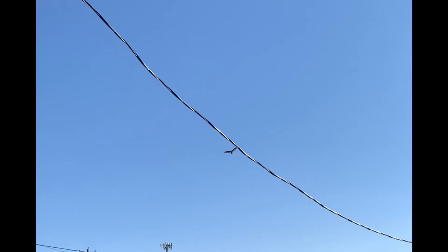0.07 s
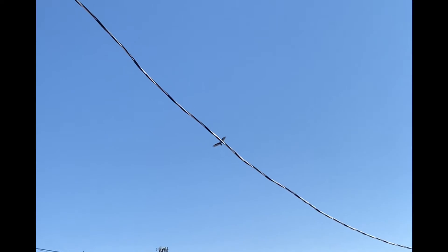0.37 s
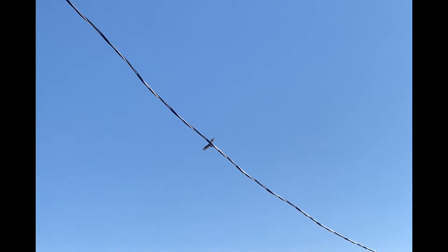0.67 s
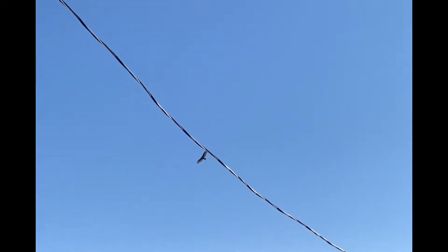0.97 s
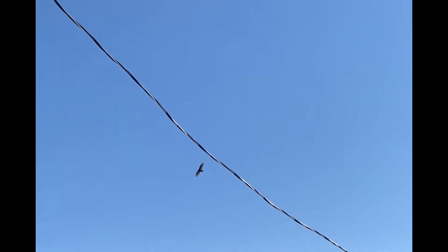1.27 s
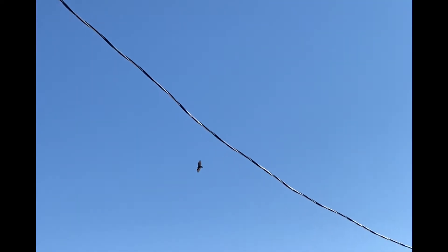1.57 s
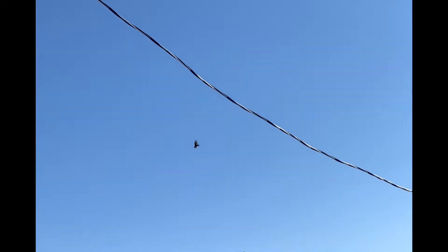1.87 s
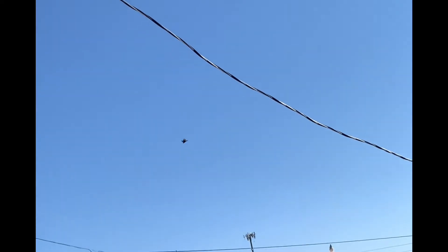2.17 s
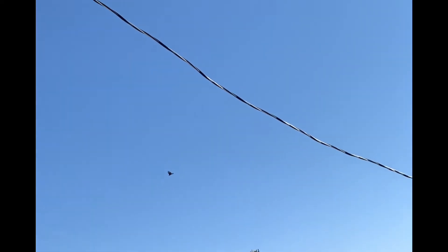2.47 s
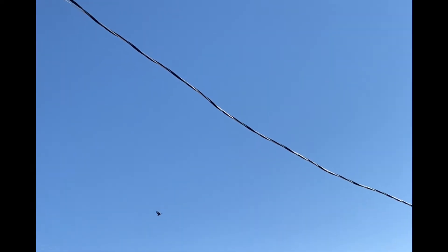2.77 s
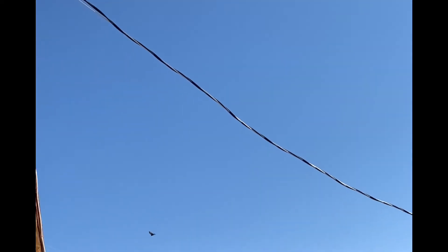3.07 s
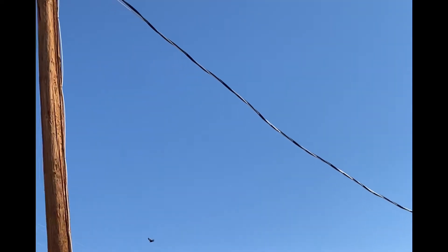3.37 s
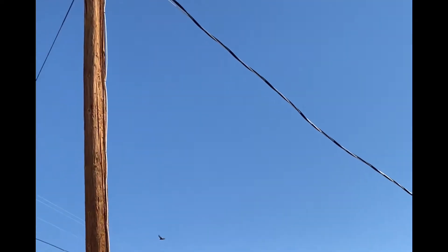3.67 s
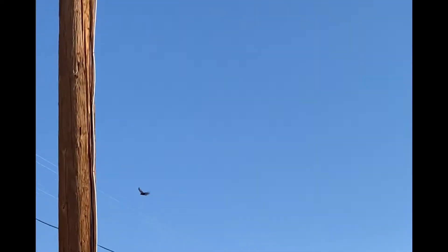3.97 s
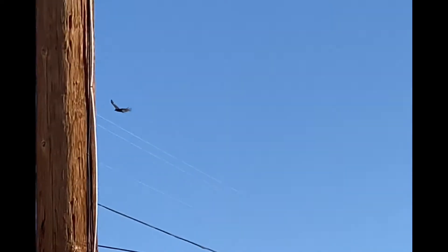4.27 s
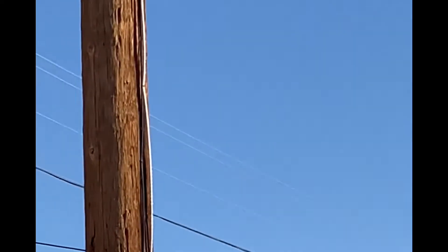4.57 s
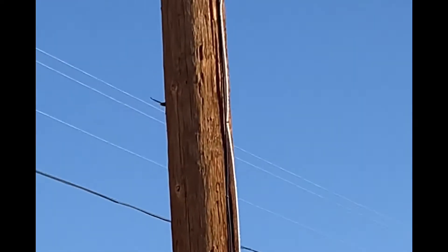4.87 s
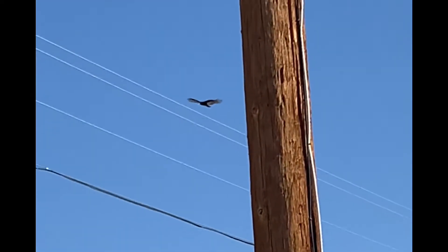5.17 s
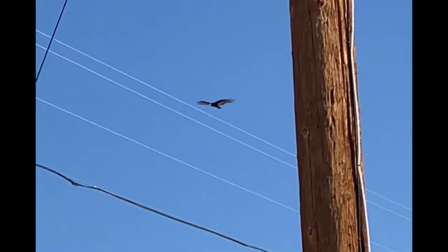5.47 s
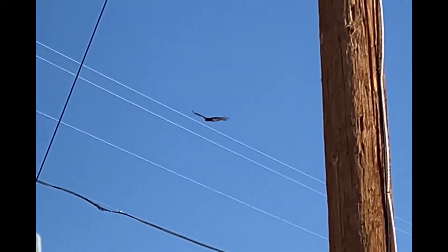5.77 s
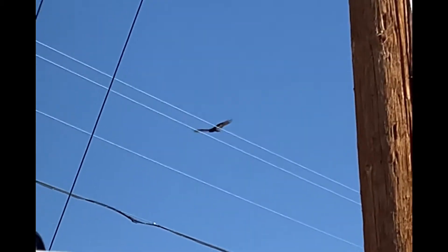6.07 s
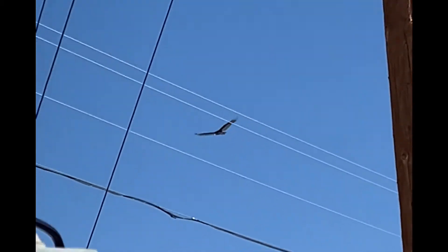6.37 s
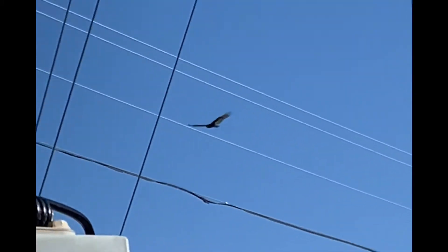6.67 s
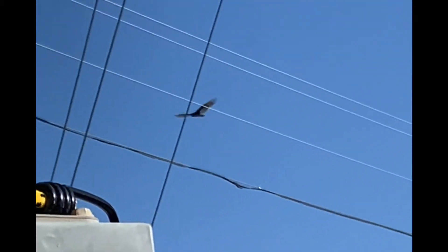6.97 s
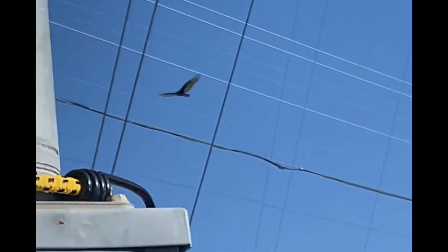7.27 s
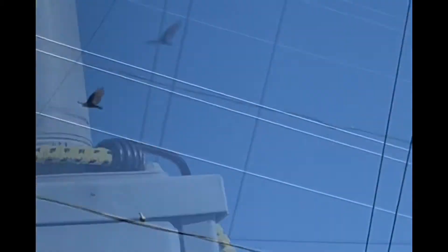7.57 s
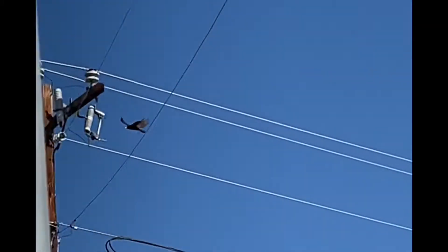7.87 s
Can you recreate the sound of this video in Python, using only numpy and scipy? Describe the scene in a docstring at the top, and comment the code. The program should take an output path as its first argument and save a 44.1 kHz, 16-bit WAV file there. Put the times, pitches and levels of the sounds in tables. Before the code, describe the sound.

Gusty wind rumbles and thuds on the microphone outdoors, over faint distant traffic and a few light handling clicks.

```python
"""Under power lines, a hand-held stereo microphone follows a soaring bird, itself unheard.
Gusts hit from the start, rumbling and shedding eddies that thud across the ports; far behind, tyres
wash, and close by, clothing swishes softly. From 2 s the hand ticks and knocks on the case, and a
distant engine draws away by 3.5 s. The wind eases, a faint electric buzz comes up around 6 s,
then hard gusts return for the last second and a half."""
import sys
import numpy as np
from scipy import signal
from scipy.fft import rfft, irfft, next_fast_len
from scipy.io import wavfile
from scipy.ndimage import uniform_filter1d

SR = 44100
rng = np.random.default_rng(int(sys.argv[2]) if len(sys.argv) > 2 else 0)


def put_to_file(sound):
    """Save the sound as 16-bit audio at rate SR, in the file named by the first command-line argument."""
    columns = np.atleast_2d(sound).T  # one column per channel
    safe = np.clip(columns, -1, 1)
    whole_steps = np.round(safe * 32767)
    wavfile.write(sys.argv[1], SR, whole_steps.astype(np.int16))


N = 354123
T = np.arange(N) / SR

# far road: t/s, tyre roar before trim/dB, tyre hiss/dB
ROAD_LEVEL = [(0.1, -59, -82.5), (0.7, -55.5, -69.5), (1.7, -60.5, -71), (2.6, -57.5, -70.5),
              (3.4, -60, -74.5), (4.1, -60, -77.5), (6.4, -62, -79.5), (7.0, -60.5, -81.5),
              (7.45, -65.5, -74), (8.0, -64, -81.5)]
# spectra of the tyres and the thin floor of air: f/Hz, relative level/dB
ROAR_SPECTRUM = [(150, 5), (300, 8.5), (480, -0.5), (650, -3), (1250, -2.5), (1750, -7), (2100, -15),
                 (2700, -34), (4000, -57)]
HISS_SPECTRUM = [(1200, -27), (2400, 3.5), (2850, -1), (3500, -2.5), (4600, -8), (5500, -14.5),
                 (7000, -17.5), (11000, -33), (15000, -37)]
AIR_SPECTRUM = [(2000, 6), (6500, -5.5), (8500, -7.5), (11000, -0.5), (14000, -13.5), (15500, -20.5)]
# distant engine drawing away: t/s, level/dB
ENGINE_LEVEL = [(0, -63), (1.0, -65.5), (2.5, -66), (3.5, -80)]
# its exhaust resonances: f/Hz, width/Hz, relative level/dB
EXHAUST_MODES = [(627, 260, 3.5), (1039, 35, -4.5), (1178, 25, -4)]
# airy rushes in the background: crest t/s, level/dB, length/s
RUSHES = [(0.309, -66, 0.59), (0.943, -67, 0.3), (5.147, -69.5, 0.54)]
# partials of the electric buzz: f/Hz, base level/dB
BUZZ_PARTIALS = [(884, -84.5), (1178, -84.5), (1771, -78.5), (1949, -87.5), (2362, -79.5), (2421, -79.5),
                 (2597, -85.5), (3483, -94.5)]
# the buzz as the microphone turns: t/s, gain/dB
BUZZ_GAIN = [(5.3, -9), (5.8, -0.5), (6.35, 3), (6.55, -11)]
# clothing near the microphone: crest t/s, base level/dB, length/s, ring f/Hz
SWISHES = [(0.664, -69, 0.13, 3570), (2.716, -69, 0.47, 2650), (3.193, -69, 0.22, 3370),
           (3.722, -70, 0.15, 2800), (4.747, -67.5, 0.23, 3500), (4.943, -73, 0.18, 2650),
           (5.824, -70, 0.25, 3420), (6.295, -72, 0.16, 3320), (6.82, -71, 0.19, 3500),
           (7.487, -74, 0.21, 3500), (8.02, -69.5, 0.15, 3540)]
# its hiss: f/Hz, relative level/dB
CLOTH_SPECTRUM = [(1200, -16), (2400, 8.5), (3000, 2), (3600, 1), (4100, -2.5), (4500, -12.5),
                  (7000, -14.5), (11000, -32.5), (15000, -47)]
# sleeve and fingers on the case: t/s, level/dB, half length/s, centre f/Hz
RUBS = [(0.929, -63, 0.022, 5200), (1.101, -57, 0.027, 1860), (1.11, -67, 0.033, 4600),
        (1.302, -64, 0.037, 2790), (1.962, -60.5, 0.057, 3840), (1.973, -70, 0.034, 5900)]
# hand ticking on the case: t/s, peak/dB, ring f/Hz, t60/s, contact/dB
TICKS = [(2.106, -46.5, 3200, 0.017, -59), (2.326, -51, 3060, .008, -56), (2.483, -39, 3030, 0.011, -43.5),
         (2.498, -48, 3130, .007, -53), (2.566, -49.5, 3030, .0064, -57), (2.924, -49.5, 3240, 0.014, -43),
         (3.682, -40, 3150, 0.0061, -47), (4.618, -60, 3900, .005, -55), (5.423, -61, 4300, .003, -47.5),
         (6.114, -53, 3080, 0.14, -67)]
# knocks of the grip: t/s, peak/dB, length/s, tilt/(dB per octave)
KNOCKS = [(2.486, -43.5, 0.011, -14), (3.6793, -32.5, 0.0034, 1), (4.556, -38, 0.017, -1.5)]
# resonances of the case: f/Hz, width/Hz, relative level/dB
CASE_MODES = [(528, 166, 7.5), (1056, 380, 4.5), (1470, 400, 5), (2320, 340, -2.5), (3500, 1500, -13),
              (5900, 650, -41)]
# breeze at the microphone: t/s, base rumble/dB
BREEZE = [(0.1, -34), (1.0, -32.5), (1.4, -40.5), (2.3, -33.5), (2.85, -40), (3.3, -33), (3.9, -38.5),
          (4.75, -42.5), (5.1, -38), (5.45, -44.5), (5.8, -37), (6.38, -41.5), (6.88, -27), (7.25, -36.5),
          (7.9, -38)]
# gusts on top of it: crest t/s, length/s, base rumble/dB, base buffeting/dB
GUSTS = [(0.184, 0.061, -27.5, -37), (0.465, 0.052, -25.5, -37.5), (0.698, 0.12, -26, -36.5),
         (0.946, 0.05, -25.5, -31), (1.254, 0.14, -20.5, -27.5), (1.425, 0.088, -22.5, -34.5),
         (1.62, 0.12, -26.5, -32.5), (1.885, 0.24, -27, -38.5), (2.078, 0.11, -26.5, -31.5),
         (2.273, 0.15, -26, -30), (3.153, 0.24, -29.5, -37.5), (3.449, 0.035, -27, -24),
         (3.637, 0.14, -29, -32), (4.083, 0.17, -34.5, -43), (4.618, 0.046, -31, -36.5),
         (5.035, 0.22, -35.5, -37), (5.61, 0.046, -35.5, -38), (6.118, 0.088, -35.5, -33),
         (6.533, 0.079, -32.5, -38.5), (6.757, 0.064, -24, -25), (7.051, 0.12, -23.5, -28),
         (7.367, 0.14, -38.5, -33), (7.627, 0.15, -29, -28), (7.823, 0.23, -31, -30.5),
         (7.94, 0.082, -25.5, -30.5)]
# spectra of large, middling and fine eddies: f/Hz, relative level/dB
RUMBLE_SPECTRUM = [(16, -44.5), (31, -9.5), (42, -1.5), (60, 5), (80, 1), (110, -2), (135, -12),
                   (190, -55.5), (500, -110)]
BUFFET_SPECTRUM = [(40, -60.5), (70, -27), (100, -8), (140, 3.5), (180, -4), (260, -14.5), (380, -20),
                   (520, -38.5), (1200, -110)]
FLUTTER_SPECTRUM = [(100, -31), (320, 1.5), (450, -1.5), (650, -11), (900, -23.5), (1400, -28.5),
                    (3000, -85)]
# fast eddies tearing at the ports: t/s, level/dB, half length/s, upper f/Hz
CRACKLES = [(1.218, -52, .005, 1000), (6.097, -47.5, 0.006, 960), (6.74, -45, 0.002, 1510),
            (6.781, -44, 0.0077, 1490), (6.892, -45, 0.0033, 1250), (7.725, -51, .008, 1500),
            (7.852, -47, 0.0018, 1050)]
# strongest single eddies: t/s, peak before trim/dB, starting f/Hz
EDDIES = [(0.47, -21.5, 260), (0.532, -23.5, 320), (0.66, -21, 380), (0.706, -20.5, 560),
          (1.02, -31.5, 520), (1.191, -20.5, 370), (1.203, -16.5, 500), (1.215, -15.5, 550),
          (1.234, -23, 500), (1.287, -20, 450), (1.614, -20, 695), (1.629, -26, 430), (1.789, -24.5, 420),
          (1.859, -21.5, 469), (1.931, -21.5, 600), (1.938, -17, 340), (2.011, -24, 600), (2.094, -25, 520),
          (2.162, -25, 489), (2.251, -23, 340), (2.463, -23, 290), (3.216, -26, 430), (3.231, -23.5, 500),
          (3.424, -31.5, 560), (3.452, -27, 510), (3.566, -28, 780), (3.576, -25, 480), (3.603, -21.5, 520),
          (3.632, -24.5, 700), (3.645, -23, 540), (3.728, -33, 470), (4.616, -23.5, 600),
          (4.984, -32.5, 450), (5.157, -34, 420), (5.914, -19.5, 350), (5.931, -19, 307), (6.088, -28, 565),
          (6.123, -30.5, 480), (6.49, -22, 280), (6.684, -27, 540), (6.706, -31.5, 660),
          (6.739, -27.5, 700), (6.768, -30.5, 950), (6.784, -25, 650), (6.862, -30.5, 720),
          (6.901, -24.5, 480), (6.964, -29, 800), (7.014, -19, 400), (7.091, -28.5, 568), (7.387, -28, 685),
          (7.579, -14.5, 430), (7.611, -23.5, 420), (7.708, -22.5, 720), (7.721, -27.5, 480),
          (7.771, -17, 310), (7.798, -11.5, 470), (7.822, -23.5, 650), (7.843, -26, 700),
          (7.851, -25.5, 700)]
# the microphone's two close ports: f/Hz, left-right likeness from 0 to 1
PORT_LIKENESS = [(300, 0.99), (450, 0.65), (700, 1), (1200, 0.18), (1750, 0.59), (2400, 0.035),
                 (3400, 0.33), (4600, 0.99)]
# lag of the right port: f/Hz, phase/rad
PORT_LAG = [(900, 0), (1700, .6), (2500, 1.6), (3600, 1.7), (4600, 3.1), (5700, 4.7), (6500, 6.2),
            (7400, 6.4), (9000, 9.4), (15300, 18.8)]
# corner below which the image closes to mono: t/s, f/Hz
MONO_CORNER = [(1.8, 950), (3.2, 250), (4.3, 367), (6.1, 175), (7.48, 265), (7.63, 600)]

FFT_SIZE = next_fast_len(N, True)
FFT_HZ = np.maximum(np.arange(FFT_SIZE // 2 + 1) * SR / FFT_SIZE, 1)


def from_db(db):
    """Decibels to gain."""
    return 10 ** (np.asarray(db) / 20)


def rms_one(x):
    """Scale to unit rms."""
    return x / np.sqrt(np.mean(x ** 2) + 1e-20)


def in_time(rows):
    """Each column of a curve at every sample."""
    times, *columns = np.transpose(rows)
    return [np.interp(T, times, column) for column in columns]


def over_frequency(points):
    """A curve at every FFT bin, joined on a log-frequency axis."""
    hz, value = np.transpose(points)
    return np.interp(np.log(FFT_HZ), np.log(hz), value)


def noise(spectrum):
    """Noise of a given colour, rms 1."""
    white = rfft(rng.standard_normal(FFT_SIZE))
    return rms_one(irfft(white * from_db(over_frequency(spectrum)), FFT_SIZE)[:N])


def drift(rate_hz, hop=40):
    """Smooth random wander with spread 1, mostly slower than rate_hz."""
    pole = np.exp(-2 * np.pi * hop * rate_hz / SR)
    white = rng.standard_normal(N // hop + 2002)
    slow = signal.lfilter([1], [1, -2 * pole, pole * pole], white)[2000:]
    return np.interp(np.arange(N) / hop, np.arange(len(slow)), rms_one(slow))


def evened(x, span_s):
    """Keep the fast grain of a sound but hold its slower level at 1."""
    width = int(span_s * SR)
    return x / np.sqrt(uniform_filter1d(uniform_filter1d(x ** 2, width), width) + 1e-6)


def resonance(x, hz, width_hz):
    """A resonance with steep skirts (two poles, twice)."""
    r = np.exp(-np.pi * width_hz / SR)
    section = [1 - r, 0, r - 1, 1, -2 * r * np.cos(2 * np.pi * hz / SR), r * r]
    return signal.sosfilt([section, section], x)


def swell(crest_s, length_s, rise_share=0.46):
    """A rounded rise to 1 and fall, above 0.6 for length_s."""
    reach_s = length_s * np.where(T < crest_s, rise_share, 1 - rise_share)
    return np.exp(-np.minimum(((T - crest_s) / reach_s) ** 2, 60) / 2)


def at_ports(common, diffuse):
    """The two ports hear the bass alike; higher up they differ and the right one lags."""
    alike = over_frequency(PORT_LIKENESS)
    fade = signal.windows.tukey(N, 0.002)
    mid = np.sqrt((1 + alike) / 2) * rfft(common * fade, FFT_SIZE)
    side = np.sqrt((1 - alike) / 2) * rfft(diffuse * fade, FFT_SIZE)
    lag = np.exp(-1j * np.interp(FFT_HZ, *np.transpose(PORT_LAG)))
    return irfft([mid + side, (mid - side) * lag], FFT_SIZE)[:, :N]


def traffic(roar_trim_db=5.5, air_db=-80):
    """Tyres on a far road: a diffuse roar and a fainter hiss over a thin steady floor."""
    roar_db, hiss_db = in_time(ROAD_LEVEL)
    waver_db = 0.5 * drift(8)
    roar = from_db(roar_db + roar_trim_db + waver_db)
    hiss = from_db(hiss_db + waver_db)
    common, diffuse = [roar * noise(ROAR_SPECTRUM) + hiss * noise(HISS_SPECTRUM)
                       + from_db(air_db) * noise(AIR_SPECTRUM) for _ in range(2)]
    return at_ports(common, diffuse)


def engine():
    """Narrow resonances of a far exhaust, blurred by the distance."""
    level_db, = in_time(ENGINE_LEVEL)
    white = rng.standard_normal((2, N))
    drone = sum(from_db(db) * rms_one(resonance(white, hz, width)) for hz, width, db in EXHAUST_MODES)
    return at_ports(*from_db(level_db) * drone)


def rush(centre_hz=1800, width_hz=800):
    """An airy rush comes and goes in the background."""
    level = sum(from_db(db) * swell(s, length, rise_share=0.29) for s, db, length in RUSHES)
    band = rms_one(resonance(rng.standard_normal((2, N)), centre_hz, width_hz))
    return at_ports(*level * band)


def from_afar(x, depth_db=3.0, span_s=0.12, span_hz=70):
    """Far sound comes by many shifting paths, so narrow bands swell and fade on their own."""
    hz, s, frames = signal.stft(x, SR, nperseg=2048)
    fading = rng.standard_normal(frames.shape[-2:])
    fading = uniform_filter1d(fading, round(span_hz / hz[1]), axis=0)
    fading = uniform_filter1d(fading, round(span_s / s[1]), axis=1)
    return signal.istft(frames * from_db(depth_db * rms_one(fading)), SR)[1][..., :N]


def buzz(waver_db=5.5, wander_rad=1.5):
    """High partials of an electric hum some way off, wavering in the moving air."""
    gain_db, = in_time(BUZZ_GAIN)
    hum = np.zeros(N)
    for hz, db in BUZZ_PARTIALS:
        amplitude = np.sqrt(2) * from_db(db + gain_db + waver_db * drift(4.6))
        hum += amplitude * np.sin(2 * np.pi * hz * T + wander_rad * drift(3.7))
    return at_ports(hum, np.zeros(N))


def swishes(grain_db=2.0, hiss_db=-2.0, ring_db=-6.0, ring_width_hz=420):
    """Close by, cloth brushes past itself in grainy swells of hiss, each ringing faintly."""
    hiss = from_db(hiss_db) * np.array([noise(CLOTH_SPECTRUM), noise(CLOTH_SPECTRUM)])
    white = rng.standard_normal((2, N))
    strokes = np.zeros((2, N))
    for s, db, length, hz in SWISHES:
        ring = from_db(ring_db) * rms_one(resonance(white, hz, ring_width_hz))
        strokes += from_db(db) * swell(s, length) * (hiss + ring)
    return at_ports(*strokes * from_db(grain_db * drift(40)))


def rubs(width_hz=2200, grain_db=4.5):
    """Sleeve and fingers slide on the case in grainy swells of friction."""
    out = np.zeros(N)
    friction = rng.standard_normal(N) * from_db(grain_db * drift(150))
    for s, level_db, half_s, hz in RUBS:
        near = np.abs(T - s) < half_s
        band = rms_one(resonance(friction[near], hz, min(width_hz, hz / 2)))
        out[near] += from_db(level_db) * np.hanning(near.sum()) * band
    return out


def ticks(width_share=0.31, chatter=0.45):
    """The hand ticks on the case: a sharp contact and a short dying chatter."""
    out, t = np.zeros(N), T[:SR // 10]
    for s, peak_db, hz, t60, contact_db in TICKS:
        burst = chatter * rng.standard_normal(len(t)) * from_db(-60 * t / t60)
        burst[0] += 2
        tick = resonance(burst, hz, width_share * hz)
        start = int(s * SR)
        out[start:start + len(t)] += from_db(peak_db) * tick / np.abs(tick).max()
        out[start] += from_db(contact_db)
    return out


def knocks():
    """The grip shifts: a short rough push sets the whole case sounding, duller for a soft touch."""
    out, t = np.zeros(N), T[:SR // 10]
    for s, peak_db, length, tilt_db in KNOCKS:
        push = rng.standard_normal(len(t)) * np.exp(-(t / length) ** 4)
        body = sum(from_db(db + tilt_db * np.log2(hz / 1000)) * rms_one(resonance(push, hz, width))
                   for hz, width, db in CASE_MODES)
        start = int(s * SR)
        out[start:start + len(t)] += from_db(peak_db) * body / np.abs(body).max()
    return out


def crackle(low_hz=480, tilt_db_per_octave=-5, edge_db_per_octave=-40):
    """The fastest eddies tear at the ports in brief rasps, each reaching up to its own pitch."""
    out = np.zeros((2, N))
    for s, level_db, half_s, upper_hz in CRACKLES:
        near = np.abs(T - s) < half_s
        size = near.sum()
        hz = np.maximum(np.arange(size // 2 + 1) * SR / size, 1)
        colour_db = tilt_db_per_octave * np.log2(hz / low_hz)
        colour_db += edge_db_per_octave * np.maximum(np.log2(hz / upper_hz), 0)
        rasp = irfft(rfft(rng.standard_normal((2, size))) * from_db(colour_db) * (hz > low_hz), size)
        out[:, near] += from_db(level_db) * rms_one(rasp * np.hanning(size))
    return at_ports(*out)


def thud(start_hz, rest_hz=138, port_hz=55):
    """One eddy crosses a port: a few pressure swings that fall in pitch; peak 1."""
    t = T[:SR // 16]
    fall_s = 0.004 * (start_hz / 500) ** -0.4  # a large, low eddy falls more slowly
    hz = rest_hz + (start_hz - rest_hz) * np.exp(-t / fall_s)
    age = t / (0.84 * fall_s)
    wave = age ** 1.404 * np.exp(-age) * np.sin(2 * np.pi * np.cumsum(hz) / SR)
    wave = signal.sosfilt(signal.butter(2, port_hz, "high", fs=SR, output="sos"), wave)
    return wave / np.abs(wave).max()


def eddies(trim_db=-2.5, uneven=0.7, tilt_db_per_octave=-0.5):
    """The strongest eddies thud singly, each nearer to one port than to the other."""
    common, diffuse = np.zeros((2, N))
    for s, peak_db, start_hz in EDDIES:
        wave = from_db(peak_db + trim_db + tilt_db_per_octave * np.log2(start_hz / 500)) * thud(start_hz)
        at = slice(int(s * SR), int(s * SR) + len(wave))
        common[at] += wave
        diffuse[at] += wave * uneven * rng.choice([-1, 1])
    return at_ports(common, diffuse)


def eddy_swarm(per_s=110, spread_db=3.5, low_hz=190, high_hz=440, sizes=5):
    """Small eddies reach the microphone at random; the finer ones are weaker."""
    out = np.zeros(N)
    for hz in np.geomspace(low_hz, high_hz, sizes):
        arrives = rng.random(N) < per_s / sizes / SR
        strength = rng.standard_normal(N)
        kicks = arrives * np.sign(strength) * from_db(spread_db * np.abs(strength))
        out += signal.oaconvolve(kicks, thud(hz))[:N] * low_hz / hz
    return rms_one(out)


def airflow(breeze_buffet_db=-7):
    """Base rumble and buffeting in dB: each gust swells and adds its power to the breeze."""
    breeze_db, = in_time(BREEZE)
    rumble = from_db(breeze_db) ** 2
    buffet = from_db(breeze_db + breeze_buffet_db) ** 2
    for s, length, rumble_db, buffet_db in GUSTS:
        gust = swell(s, length, rise_share=0.5)
        rumble += (from_db(rumble_db) * gust) ** 2
        buffet += (from_db(buffet_db) * gust) ** 2
    return 10 * np.log10([rumble, buffet])


def turbulence(surge_db=1.5, lump_db=8.0, burst_db=7.0, fine_growth=1.37, pivot_db=-32):
    """Wind right on the microphone: large eddies rumble, middling ones buffet, fine ones flutter."""
    rumble_db, buffet_db = airflow()
    fine_db = pivot_db + fine_growth * (buffet_db - pivot_db)  # fine eddies grow fastest in a gust
    lumps = drift(24)
    rumble = from_db(rumble_db + surge_db * drift(7.3)) * evened(noise(RUMBLE_SPECTRUM), span_s=0.064)
    swarm = from_db(fine_db - 4.5) * evened(eddy_swarm(), span_s=0.05)
    common, diffuse = np.zeros((2, N))
    for part in (common, diffuse):
        buffet = evened(noise(BUFFET_SPECTRUM) * from_db(lump_db * lumps), span_s=0.076)
        flutter = evened(noise(FLUTTER_SPECTRUM) * from_db(burst_db * lumps), span_s=0.34)
        part += from_db(buffet_db - 5) * buffet + from_db(fine_db - 20.5) * flutter
    return at_ports(rumble + swarm + common, diffuse)


def midrange_dip(x, at_s=3.325, half_s=0.085, centre_hz=660, width_octaves=0.5, depth_db=-17):
    """The midrange sinks for a moment."""
    hz, s, frames = signal.stft(x, SR, nperseg=1024)
    band = np.exp(-(np.log2(np.maximum(hz, 1) / centre_hz) / width_octaves) ** 2)
    moment = np.exp(-((s - at_s) / half_s) ** 4)
    return signal.istft(frames * from_db(depth_db * np.outer(band, moment)), SR)[1][..., :N]


def narrow_bass(x, order=8.5, leak_db=-50):
    """Below a moving corner the two sides merge into one."""
    corner_hz, = in_time(MONO_CORNER)
    mid, side = (x[0] + x[1]) / 2, (x[0] - x[1]) / 2
    hz, s, frames = signal.stft(side, SR, nperseg=1024)
    highpass = 1 / np.sqrt(1 + (np.interp(s, T, corner_hz) / np.maximum(hz, 1)[:, None]) ** (2 * order))
    side = signal.istft(frames * (highpass + from_db(leak_db)), SR)[1][:N]
    return np.array([mid + side, mid - side])


def scene():
    """Road, engine and buzz lie far off; clothes, hand and wind act right at the microphone."""
    wash = from_afar(traffic() + engine() + rush())
    hand = at_ports(*[ticks() + rubs() + knocks() for _ in range(2)])
    return midrange_dip(wash + turbulence()) + eddies() + crackle() + swishes() + hand + buzz()


def record(dry):
    """The input opens after a moment; the bass is narrowed and the top is cut by 16 kHz."""
    opening = from_db(np.interp(T, [0.062, 0.08, 0.13], [-65, -7, 0]))
    top_cut = signal.cheby2(12, 60, 16000, fs=SR, output="sos")
    return signal.sosfilt(top_cut, narrow_bass(dry) * opening)


dry = scene()
out = record(dry)
put_to_file(out)
```